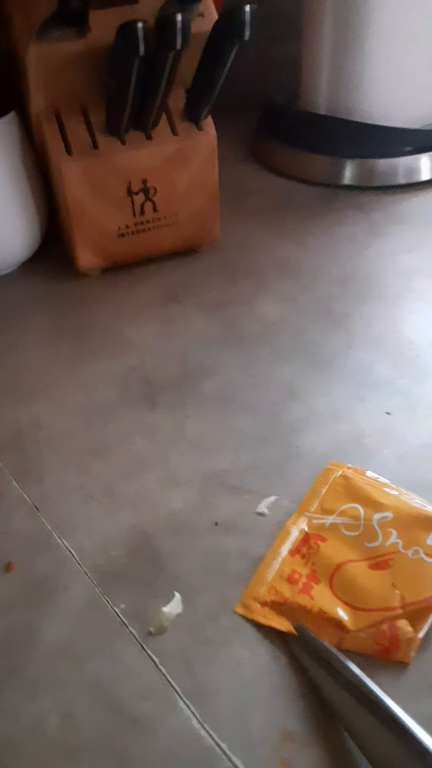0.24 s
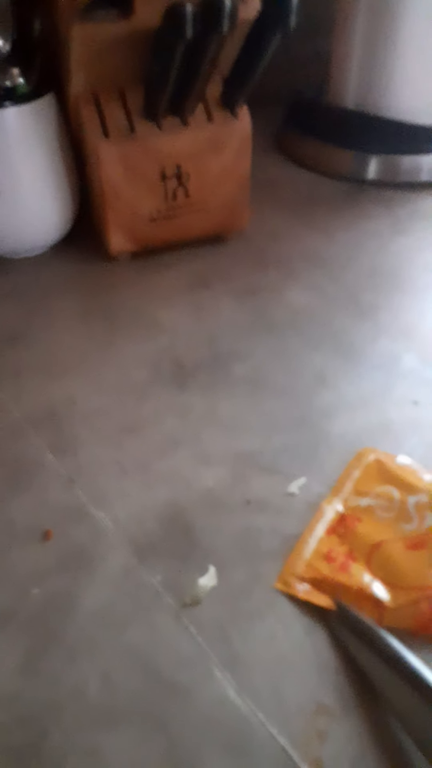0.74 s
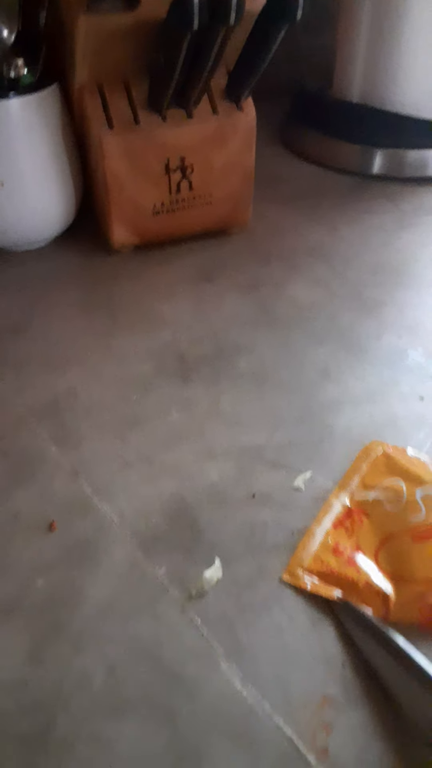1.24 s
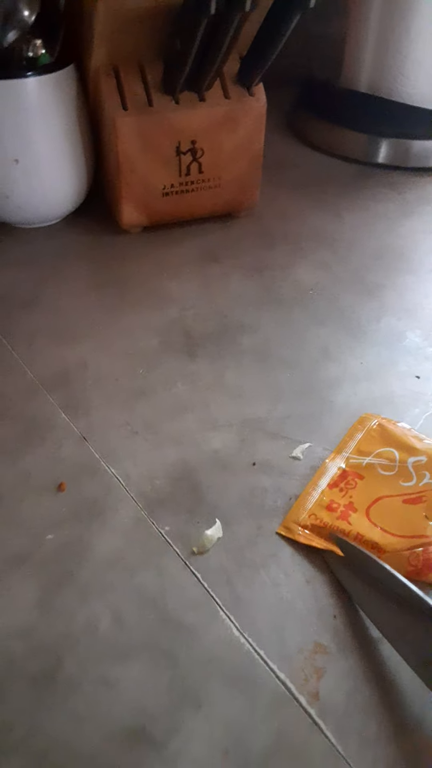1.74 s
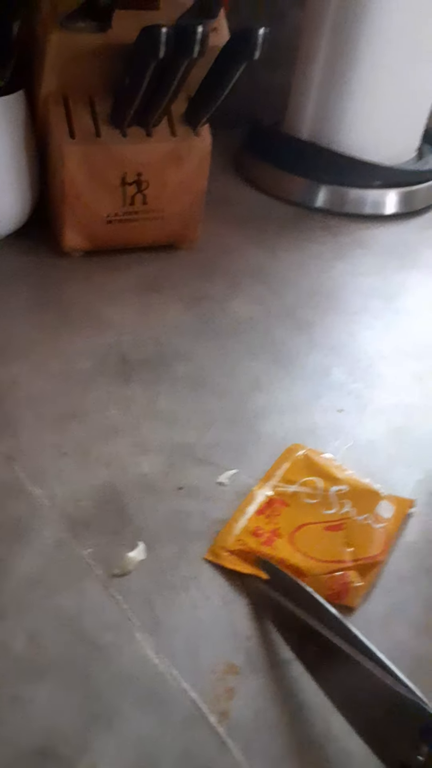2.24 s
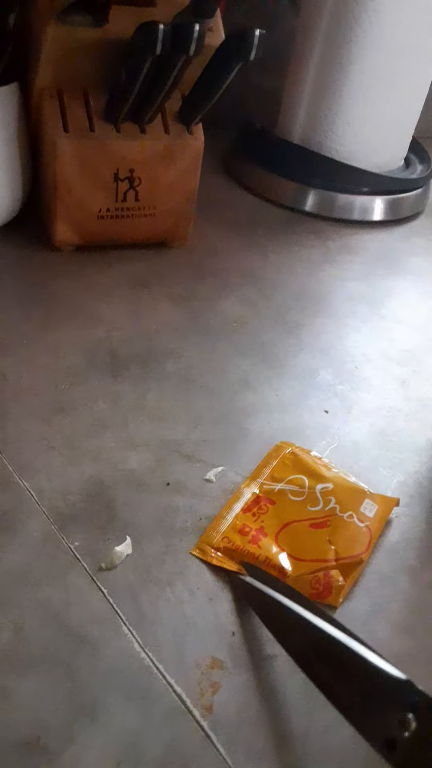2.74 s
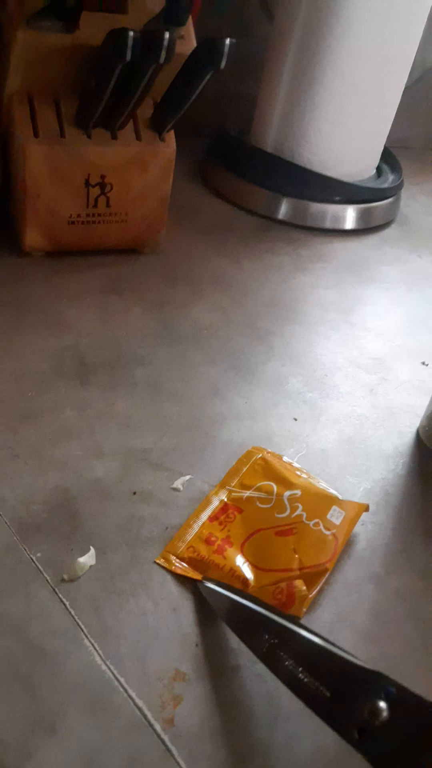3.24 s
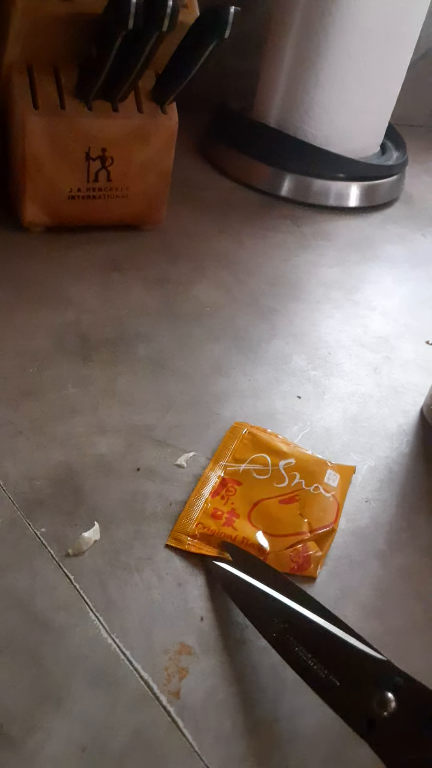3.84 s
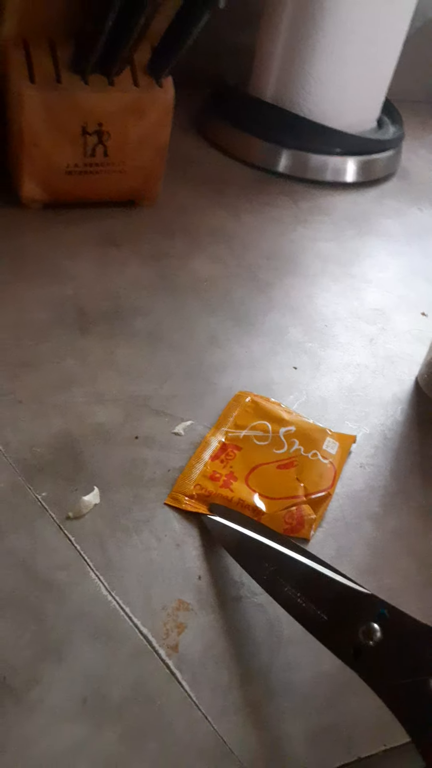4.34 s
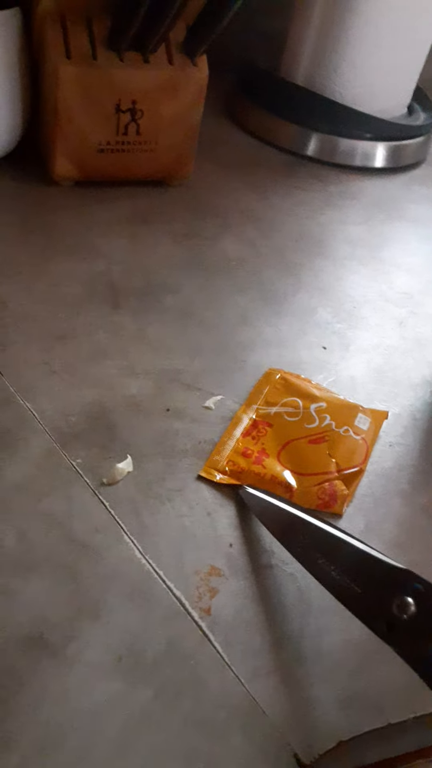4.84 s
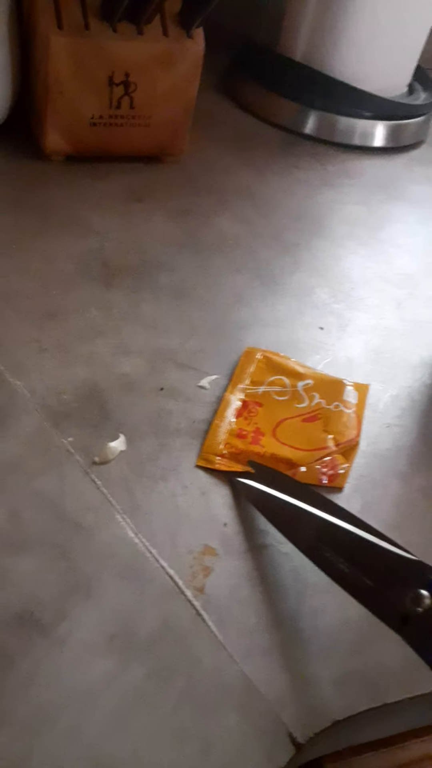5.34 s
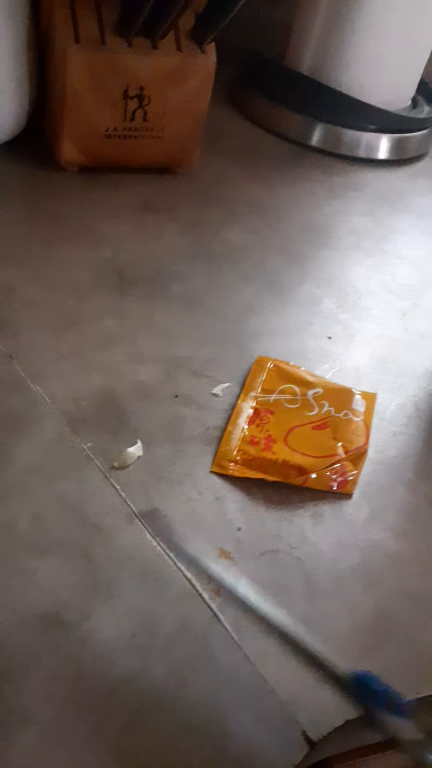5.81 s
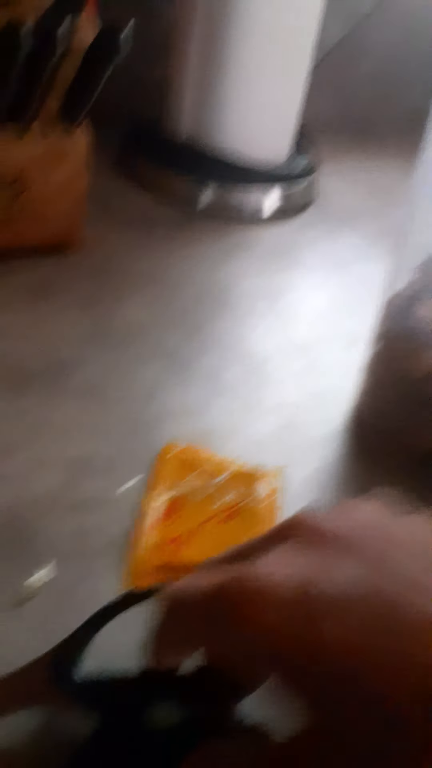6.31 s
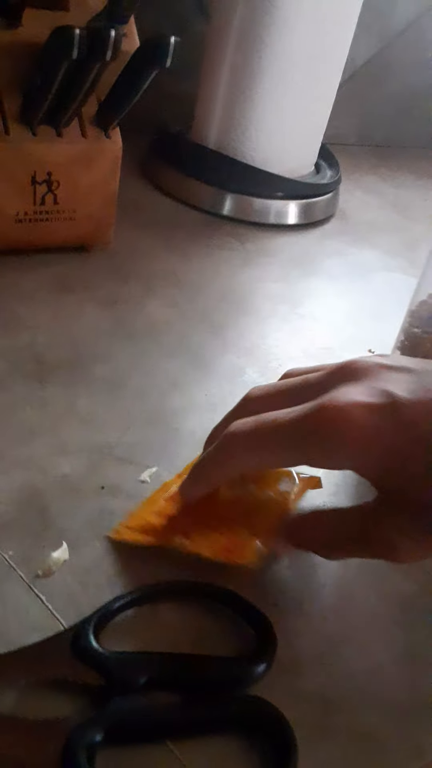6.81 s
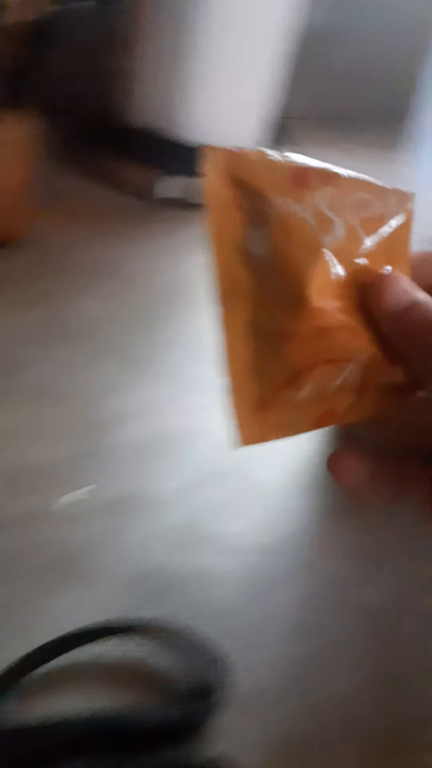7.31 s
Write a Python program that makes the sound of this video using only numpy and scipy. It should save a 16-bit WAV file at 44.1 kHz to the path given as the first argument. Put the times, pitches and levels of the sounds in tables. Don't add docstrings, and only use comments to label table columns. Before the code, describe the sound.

Close to a phone in a small hard kitchen, plastic film hisses and clicks, then scissors bite a sachet in short crackling crunches with thin metallic rings and soft air-pillow thumps. More bites and two hard blade snaps follow after pauses. The scissors drop on the counter, scrape and land with a loud rattling clatter; fingers then gather the packet in light stiff crinkles. A low fridge hum throbs throughout.

```python
import sys
import numpy as np
from scipy import signal
from scipy.fft import rfft, irfft, next_fast_len
from scipy.io import wavfile
from scipy.ndimage import uniform_filter1d

SR = 44100
rng = np.random.default_rng(int(sys.argv[2]) if len(sys.argv) > 2 else 0)


def gain_from_db(level_db):
    decades = np.asarray(level_db, float) / 20
    return 10 ** decades


def bounce(signal):
    frames = np.transpose(np.atleast_2d(signal))
    limited = np.clip(frames, -1, 1)
    pcm = np.round(limited * 32767).astype(np.int16)
    wavfile.write(sys.argv[1], SR, pcm)


N = 333725
SIZE = next_fast_len(N + SR)
HZ = np.maximum(np.arange(SIZE // 2 + 1) * SR / SIZE, 1)
T = np.arange(N) / SR
BURST = 4000
BURST_HZ = np.arange(BURST // 2 + 1) * SR / BURST


def on_log(table):
    table = np.array(table)
    return np.interp(np.log(HZ), np.log(table[:, 0]), table[:, 1])


def shape(x, response):
    return irfft(rfft(x, SIZE) * response, SIZE)[..., :N]


def unit(response):
    return response / np.sqrt(np.mean(abs(response) ** 2))


def resonance(hz, centre, width):
    return 1j * hz * width / (centre ** 2 - hz ** 2 + 1j * hz * width)


def modes(table):
    return sum((-1) ** k * gain_from_db(db) * resonance(HZ, f, w) for k, (f, w, db) in enumerate(table))


def gaps(table):
    response = 1
    for f, w, db in table:
        away = f ** 2 - HZ ** 2
        response = response * (away + 2j * HZ * w * gain_from_db(db)) / (away + 2j * HZ * w)
    return response


def strike(x, table):
    response = modes(table)
    return shape(x, response / abs(irfft(response)).max())


def walk(rate):
    k = int(SR / rate)
    steps = np.repeat(rng.standard_normal(N // k + 1), k)
    return 3.2 * uniform_filter1d(uniform_filter1d(steps, k), k)[:N]


def grains(spread_db, alike=0.52):
    size = gain_from_db(spread_db * np.minimum(rng.exponential(size=N), 4))
    shared, own = rng.standard_normal(N), rng.standard_normal((2, N))
    x = size * (np.sqrt(alike) * shared + np.sqrt(1 - alike) * own)
    return x / x.std()


def curve(rows):
    rows = np.array(rows)
    edge = np.clip(np.minimum(T - rows[0, 0], rows[-1, 0] - T) / 0.0085, 0, 1)
    return edge * gain_from_db(np.interp(T, rows[:, 0], rows[:, 1]))


def strokes(rows, attack_s, fade_db_s, axis):
    power = 0
    for row in rows:
        t = T - row[0]
        rise = np.clip(t / attack_s, 0, 1) ** 2
        fade_db = fade_db_s * np.maximum(t - attack_s - row[1], 0)
        power = power + (rise * gain_from_db(row[axis] - fade_db)) ** 2
    return np.sqrt(power)


def add(out, s, burst):
    i = int(s * SR)
    out[:, i:i + len(burst)] += burst


def swell(ms, skew):
    u = np.arange(BURST) / (max(ms, .05) * SR / 1000)
    return (u / skew) ** skew * np.exp(skew - u)


def near_any(s, times, within_s):
    return min(abs(s - np.array(times))) < within_s


# time_s, level_db
BACK = [(0, 6.5), (0.28, 4.5), (0.5, 1.5), (1.2, 4.5), (2.1, 0.5), (3.3, 2.5), (4.3, 4), (5.3, 3),
        (6.9, 0.5), (7.1, -3.5), (7.567, -4.5)]
# multiple of mains, level_db, throb_depth (0-1), throb_hz
HUM = [(1, -6, 0.8, .38), (2, -1, 0.65, 1.62), (3, -11, 0.1, 1.62), (4, -12, .2, 1.62), (5, -10, .1, 1.62),
       (8, -22, .3, .38), (10, -21, .3, .38)]
# pitch_hz, density_db per Hz
AIR = [(15, -50), (25, -7.5), (107, 1), (132, 3.5), (167, -10.5), (253, -7), (300, -1.5), (321, -2.5),
       (350, -10), (375, -13), (694, -16.5), (1220, -24.5), (1500, -23), (1950, -51), (3300, -120)]
# pitch_hz, density_db per Hz
HISS = [(590, -32), (1000, 3), (1240, 1), (1580, -1.5), (2220, -5), (2650, -6), (5050, -11.5), (5950, -18),
        (8070, -16), (9850, -23.5), (14300, -9), (15900, -18.5), (16500, -39.5)]
MAINS_HZ, THROB_TOP_S = 60, .07
RUMBLE_DB, AIR_DB, HISS_DB, HUM_DB = -63, -66.5, -68, -61


def kitchen():
    open_db = np.interp(T, *np.array(BACK).T)
    hum = 0
    for k, db, depth, rate in HUM:
        level = gain_from_db(db + 0.076 * k * open_db + 0.39 * walk(3.3))
        throb = 1 + depth * np.cos(2 * np.pi * rate * (T - THROB_TOP_S))
        hum = hum + level * throb * np.sin(2 * np.pi * (k * MAINS_HZ * T + rng.random()))
    out = gain_from_db(HUM_DB + 0.43 * open_db + np.array([[1.5], [-1.5]])) * hum
    rumble_db = RUMBLE_DB + 1.1 * open_db + .8 * walk(3.5)
    layers = ((AIR, 15, 160, rumble_db, .85),
              (AIR, 160, 1300, AIR_DB + open_db, .75),
              (HISS, 1300, 17000, HISS_DB + 0.33 * open_db, .3))
    for table, lo_hz, hi_hz, db, alike in layers:
        band = gain_from_db(on_log(table)) / (1 + (lo_hz / HZ) ** 4) / (1 + (HZ / hi_hz) ** 8)
        out = out + gain_from_db(db + 0.19 * walk(7.3)) * shape(grains(.6, alike), unit(band))
    return out


# start_s, hold_s, film_hiss_db, rub_db
SLIDE = [(0.095, 0.25, -51.5, -76), (0.15, 0.11, -52.5, -54.5), (1.295, 0.042, -59.5, -52),
         (1.452, 0.023, -65, -53), (1.58, 0.012, -61, -59), (2.05, 0.0023, -61, -59), (2.12, 0.1, -65, -76),
         (3.73, 0.024, -53.5, -52.5), (4.11, 0.053, -60, -55.5), (4.33, 0.16, -62.5, -71.5),
         (4.97, 0.046, -58.5, -57), (5.025, 0.055, -59, -58.5), (5.565, 0.018, -47.5, -48.5),
         (5.62, 0.015, -54.5, -47), (5.735, 0.014, -60, -66), (6.27, 0.087, -51.5, -75),
         (6.44, 0.13, -53.5, -74.5)]
# pitch_hz, density_db per Hz
FILM = [(1180, -39.5), (2000, -15.5), (4240, -6.5), (5050, -12.5), (5720, -4.5), (6760, -12.5),
        (8360, -2.5), (9460, -9), (15000, -3), (15900, -5), (16500, -35.5)]
# pitch_hz, density_db per Hz
RUB = [(88, -41), (150, -10.5), (218, -10), (306, 0), (414, -10.5), (692, -8.5), (983, -20.5),
       (1300, -13.5), (3000, -33), (3900, -34.5), (6600, -120)]
# pitch_hz, width_hz, lift_db
LIFTED_BANDS = [(4200, 250, 4.5), (5700, 290, 7.5), (8200, 460, 1), (10800, 500, 4.5), (13300, 600, 4),
                (15100, 400, 3)]
# start_s, hold_s, level_db
SQUEAKS = [
    (3.93, .07, -71),
    (5.44, .14, -71.5),
]
# pitch_hz, width_hz, level_db
SQUEAK = [(2030, 40, 1), (2160, 40, 0)]
LIFTED_UNTIL_S, LIFTED_SHEEN_DB = 1.2, 4
STROKE_ATTACK_S, STROKE_FADE_DB_S = 0.044, 270


def slide():
    hiss = strokes(SLIDE, STROKE_ATTACK_S, STROKE_FADE_DB_S, axis=2) * gain_from_db(0.71 * walk(54) - 5)
    hiss = hiss * grains(1.6, alike=0.19)
    rub = strokes(SLIDE, STROKE_ATTACK_S, STROKE_FADE_DB_S, axis=3) * gain_from_db(1.2 * walk(40) - 3)
    rub = rub * grains(6.3, alike=0.94)
    squeak = strokes(SQUEAKS, STROKE_ATTACK_S, STROKE_FADE_DB_S, axis=2) * grains(1.2, alike=0.81)
    film = unit(gain_from_db(on_log(FILM)))
    sheen_db = LIFTED_SHEEN_DB * (2 / (1 + (11000 / HZ) ** 6) - 1.5)
    lifted_film = film * gaps(LIFTED_BANDS) * gain_from_db(sheen_db - 2)
    flat = T > LIFTED_UNTIL_S
    out = shape(hiss * flat, film) + shape(hiss * ~flat, lifted_film)
    return out + shape(rub, unit(gain_from_db(on_log(RUB)))) + shape(squeak, unit(modes(SQUEAK)))


# start_s,
# level_db, pitch_hz, width_hz
POPS = [(0.31, -48, 3400, 900), (0.3891, -21.5, 2250, 610), (0.3935, -36, 2100, 260),
        (6.2567, -20, 3750, 500), (6.272, -26.5, 3800, 300), (6.289, -28, 3800, 300),
        (5.7952, -38.5, 900, 220), (4.7605, -36.5, 1310, 130), (4.759, -36, 270, 60),
        (5.058, -46.5, 9000, 3000), (6.8385, -40, 2180, 400)]
# start_s, level_db, length_ms, pitch_hz
CATCHES = [(6.1, -30.5, 6, 696), (6.122, -35.5, 2.5, 2105), (6.128, -30.5, 5, 236), (6.152, -30, 5, 704),
           (6.155, -29, 7, 226), (6.17, -37.5, 2, 2115), (6.18, -28, 4.5, 663), (6.183, -32, 4, 1236),
           (6.195, -30, 8, 227), (6.205, -34, 9, 1255), (6.21, -35, 5, 700), (6.235, -32.5, 4, 700)]
POP_ATTACK_MS = .35


def pops():
    out, t = np.zeros((2, N)), T[:BURST]
    for s, db, hz, width in POPS:
        envelope = (1 - np.exp(-1000 * t / POP_ATTACK_MS)) * np.exp(-np.pi * width * t)
        add(out, s, gain_from_db(db + 4.5) * envelope * np.sin(2 * np.pi * hz * t))
    for s, db, ms, hz in CATCHES:
        add(out, s, gain_from_db(db) * swell(ms, 2.5) * np.sin(2 * np.pi * hz * t))
    return out


# start_s, level_db, pitch_hz, low_knock_db,
# treble_db
CLICKS = [(0.358, -51, 3060, -76, -19), (0.388, -45, 2300, -53, 2), (1.5958, -41, 4100, -58, 4),
          (1.8485, -44.5, 8350, -66, -22), (2.086, -46, 8650, -49.5, -19), (3.3955, -12.5, 4240, -38.5, 10),
          (3.738, -40, 9000, -70, -17), (3.914, -47, 1520, -66, -3), (5.074, -39, 9000, -64, -16),
          (4.76, 0.5, 8800, -29, -2), (5.0567, -35, 11960, -48, -18.5), (5.6212, -31, 8500, -68, -12),
          (5.7565, -50.5, 8500, -75, -21.5), (5.7626, -35, 8700, -75, -20.5), (5.7755, -46, 8000, -79, -9),
          (5.7944, -14.5, 9400, -56, -5), (6.2561, -3, 9000, -40, 0), (6.685, -47, 4580, -57.5, -20),
          (6.6944, -36.5, 1690, -70, -12), (6.7096, -41, 2200, -57, -14), (6.7712, -38, 7400, -69, -8),
          (6.811, -34.5, 3000, -57, -18), (6.8179, -31, 5300, -82, -7.5), (6.8382, -36.5, 2160, -76, -20),
          (6.9765, -50, 4970, -70, -12), (7.021, -35, 4660, -74, 1)]
CLEAN_CLICKS_S = [
    0.389,
    6.256,
    6.838,
]
# click_s, level_db
SQUEEZES = [
    (3.3953, -47),
    (4.76, -20),
]
# pitch_hz, width_hz, level_db
BAG = [(323, 63, 1), (450, 210, -12.5), (262, 84, -3.5)]
# pitch_hz, width_hz, level_db
BLADE = [(860, 130, -5.5), (1290, 77, -4), (2200, 160, -12)]
SPRAY_MS, CLEAN_SPRAY_DB = 2.4, -11.5


def clicks():
    out, knock = np.zeros((2, 2, N))
    noises = rng.standard_normal((len(CLICKS), BURST))
    before = swell(2, 4.6) * (np.arange(BURST) < .008 * SR)
    for (s, db, centre_hz, low_db, treble_db), noise in zip(CLICKS, noises):
        broad = gain_from_db(treble_db) * 1j * BURST_HZ / (3000 + 1j * BURST_HZ)
        pitched = .8j * BURST_HZ * centre_hz / (centre_hz ** 2 - BURST_HZ ** 2 + .8j * BURST_HZ * centre_hz)
        colour = broad + pitched ** 2
        crack = irfft(colour) * (np.arange(BURST) < 400)
        spray = irfft(rfft(noise) * colour)
        clean_db = CLEAN_SPRAY_DB if near_any(s, CLEAN_CLICKS_S, .005) else 0
        spray *= gain_from_db(clean_db) / spray.std()
        burst = gain_from_db(db + 3.5) * crack / abs(crack).max()
        burst += gain_from_db(db - 18.5) * spray * swell(SPRAY_MS, 0.46)
        add(out, s + 0.000884, burst)
        squeeze = sum(gain_from_db(squeeze_db) for at, squeeze_db in SQUEEZES if abs(at - s) < .01)
        add(out, s - .007, squeeze * spray[::-1] * before)
        add(knock, s + 0.0011, gain_from_db(low_db + 3) * swell(1, 1.1))
    return out + shape(knock * grains(1.3, alike=0.95), unit(modes(BAG + BLADE)))


# start_s, crackle_db, blade_db, bag_thump_db, length_ms
SNIPS = [(0.884, -18.5, -29, -24.5, 11.4), (0.9306, -24.5, -36, -29, 9.7), (1.016, -18.5, -25, -27, 20.9),
         (1.346, -35, -41.5, -46, 9.6), (3.1295, -18, -33, -30, 17.7), (3.253, -20, -39, -32, 18),
         (3.362, -23, -44, -37.5, 9.1), (3.7519, -17.5, -50, -64, 7), (4.6152, -12.5, -32.5, -39, 15.5),
         (4.6555, -16, -37.5, -29, 8), (5.5958, -40, -51.5, -55, 19), (5.7635, -37, -64.5, -80.5, 19)]
WIDE_BITES_S = [
    0.93,
    4.615,
    5.763,
]
# pitch_hz, density_db per Hz
CRACKLE = [(1470, -62), (2500, -13.5), (2930, -22.5), (3830, -18.5), (4850, -20.5), (6200, -10),
           (6750, -13), (7670, -1.5), (9800, -4), (14000, -3.5), (15500, -2), (16500, -34.5)]
# pitch_hz, width_hz, level_db
BAG_LIFTED = [(281.4, 37, 8.5), (590, 170, -4.5), (740, 74, 1.5)]
# start_s, level_db
TAPS = [(0.886, -32), (.889, -40), (1.0205, -17), (1.0245, -19), (1.0265, -8.5), (1.0295, -13),
        (1.356, -41), (1.373, -44), (1.478, -50), (1.492, -47), (1.5, -47), (1.506, -48), (1.52, -52),
        (1.607, -44)]
# pitch_hz, width_hz, level_db
TIP = [(478, 47, 12), (1130, 110, -50), (1550, 220, 4.5), (2100, 55, -24), (2080, 110, 1)]
# pitch_hz, width_hz, level_db
THUD = [(256.6, 32.6, 1), (112, 69, -7), (332.6, 93, -5.5)]
BLADE_HZ, WIDE_BLADE_HZ = 1226, 815


def snips():
    film, ring, flat, lifted, tap = np.zeros((5, 2, N))
    upper = 0.12 * resonance(BURST_HZ, 1700, 1607) - 0.27 * resonance(BURST_HZ, 2300, 440)
    soft = swell(0.17, 1.2) / swell(0.17, 3.5).sum()
    noises = rng.standard_normal((len(SNIPS), BURST))
    for (s, db, blade_db, bag_db, ms), noise in zip(SNIPS, noises):
        add(film, s - .001, gain_from_db(db - 13) * swell(0.37 * ms, 0.42))
        blade_hz = WIDE_BLADE_HZ if near_any(s, WIDE_BITES_S, .01) else BLADE_HZ
        rubbing = rfft(noise * swell(0.2 * ms, 1.3))
        blade = irfft(rubbing * (resonance(BURST_HZ, blade_hz, 170) + upper))
        add(ring, s, gain_from_db(blade_db + 3) * blade / abs(blade).max())
        bag = lifted if s < LIFTED_UNTIL_S else flat
        add(bag, s + 0.343 * ms / 1000, gain_from_db(bag_db) * soft)
        add(bag, s + 0.6965 * ms / 1000, gain_from_db(bag_db + 1) * soft)
    for s, db in TAPS:
        add(tap, s + 0.0013, gain_from_db(db - 2) * np.ones(3) / 3)
    crackle = shape(film * grains(1.3), unit(gain_from_db(on_log(CRACKLE))))
    thump = strike(flat, BAG) + strike(lifted, BAG_LIFTED)
    thump += gain_from_db(-8) * strike(flat + lifted, THUD[1:2])
    damped_tip = [(f, 70 + w, db) for f, w, db in TIP]
    return crackle + ring + thump + strike(tap, damped_tip)


# start_s, level_db
SHUTS = [
    (4.7608, -20),
    (5.7952, -13.5),
    (3.3962, -37),
]
# pitch_hz, width_hz, level_db
SHUT = [(3190, 180, -5), (4400, 530, -11), (5300, 430, -7.5), (6690, 500, -10), (8300, 400, -3),
        (9600, 560, -4), (11000, 500, -4), (12600, 500, -14)]
# start_s, level_db, length_ms
PINGS = [
    (1.321, -57, 3.5),
    (1.33, -55, 2),
    (1.347, -38.5, 1.76),
    (1.386, -47, 1.5),
    (1.527, -55, 1.5),
    (1.608, -57, 2),
]
PING_HZ = 1304


def shut():
    blow, ping = np.zeros((2, 2, N))
    for s, db in SHUTS:
        add(blow, s, gain_from_db(db) * swell(0.22, .3) * rng.standard_normal(BURST) / 2.1)
    for s, db, ms in PINGS:
        add(ping, s, gain_from_db(db) * swell(ms, 2.5) * np.sin(2 * np.pi * PING_HZ * T[:BURST]))
    return strike(blow, SHUT) + ping


# start_s, level_db, brightness_db
KNOCKS = [(5.9875, -5, -9.5), (5.989, -7, -8.5), (5.992, -11, -15), (5.996, -14.5, -15.5),
          (6.013, -18.5, -17.5), (6.015, -17.5, -17.5), (6.107, -27, -20.5), (6.127, -23.5, -18),
          (6.159, -24, -14), (6.187, -21.5, -8.5), (6.255, -13.5, -7), (6.256, -15.5, -6.5),
          (6.263, -22, -9.5), (6.273, -18.5, -13), (6.288, -18.5, -17), (6.293, -22, -17.5),
          (6.392, 1.5, -14.5), (6.394, -7.5, -21.5), (6.395, -4, -23.5), (6.399, -20.5, -19.5),
          (6.406, -19.5, -22.5), (6.419, -21, -16), (6.427, -3, -13), (6.43, -5, -22), (6.433, -10, -22),
          (6.438, -17.5, -21), (6.447, -6.5, -22.5), (6.457, -16, -24.5), (6.461, -15, -23.5),
          (6.469, -8.5, -24.5), (6.476, -18.5, -26), (6.483, -16.5, -25.5), (6.498, -24, -26.5),
          (6.509, -30, -24)]
# pitch_hz, width_hz, level_db
BODY = [(258, 110, 1), (674, 42, 4), (1342, 110, 5.5), (1970, 80, -1.5), (2390, 70, -7), (3100, 100, -7.5),
        (3780, 80, -12.5), (4000, 60, -9)]
# time_s, level_db
DRAG = [
    (6.003, -24.5),
    (6.04, -31),
    (6.07, -33),
    (6.1, -33),
    (6.143, -32),
    (6.185, -29),
    (6.21, -35.5),
    (6.252, -39.5),
]
# pitch_hz, width_hz, level_db
SKID_FLAT = [(258, 35, -0.5), (673, 110, -0.5), (1060, 40, -9), (1351, 150, -6), (1970, 70, -14),
             (2250, 70, -15), (2950, 50, -19.5), (3160, 50, -21), (3940, 130, -15.5), (4750, 160, -29),
             (5460, 70, -26), (6880, 130, -19), (9000, 220, -24.5)]
# pitch_hz, width_hz, level_db
SKID = [(231, 15, 2.5), (660, 120, -3), (1210, 82, -2), (2070, 87, -8), (2630, 81, -19), (2970, 51, -18),
        (3220, 90, -21), (3955, 120, -18), (4800, 140, -28), (5550, 100, -27), (6760, 74, -26),
        (9000, 240, -24), (9310, 36, -29)]
# pitch_hz, width_hz, level_db
SKID_GAPS = [(980, 80, -14), (1780, 200, -14), (440, 60, -9.5), (3660, 120, -16.5), (6050, 120, -9.5)]
# pitch_hz, density_db per Hz
GRIT = [(1470, -23), (2500, 0.5), (2840, -11.5), (3770, -2.5), (7370, -11), (8840, -8.5), (11700, -12),
        (15100, -10.5), (16500, -37)]
# start_s, length_s, rattle_db, fade_db_per_s
ROCK = [
    (6.255, .12, -33, 172),
    (6.393, 0.28, -21, 144),
]
# pitch_hz, density_db per Hz
RATTLE = [(47, -47.5), (80, -24), (327, -11.5), (373, -13.5), (517, -7), (552, -14.5), (672, -8.5),
          (818, -7.5), (1150, -19.5), (1310, -6.5), (3200, -25.5), (3800, -22.5), (4400, -33), (5200, -66),
          (8800, -120)]
# start_s, level_db, length_ms
JANGLES = [
    (6.421, -29, 1.2),
    (6.429, -31.5, 0.66),
    (6.436, -28, 2),
    (6.453, -35, 1),
]
# pitch_hz, density_db per Hz
CHATTER = [(1290, -30), (2200, -7.5), (3770, -19.5), (6420, -18.5), (8130, -13), (9540, -17.5),
           (14900, -13), (16100, -21.5), (16500, -48.5)]
PUSH_MS = 0.027
SLAB_DB, SLAB_PER_DB = -10.5, 1.04
DRAG_GRIT_DB = -18
TIPS_UP_S, TIPS_UP_TAKES_S = 6.06, 0.045
CHATTER_DB, CHATTER_PER_DB = -23.5, 0.84


def scissors():
    push, thud, tick, jangle = np.zeros((4, 2, N))
    blow = swell(PUSH_MS, 1.4)
    slab = swell(0.21, 1.1) / swell(0.18, 1.3).sum()
    for s, db, bright_db in KNOCKS:
        add(push, s + 0.00239, gain_from_db(db + 0.5) * blow / blow.sum())
        add(thud, s + 0.0028, gain_from_db(SLAB_DB + SLAB_PER_DB * db) * slab)
        add(tick, s + .0022, gain_from_db(db + bright_db - 5.5) * swell(1.5, 0.34))
    for s, db, ms in JANGLES:
        add(jangle, s, gain_from_db(db) * swell(ms, 1))
    damped = [(f, 70 + 1.1 * w, db) for f, w, db in BODY[1:]]
    grit = gain_from_db(on_log(GRIT))
    tick_colour = unit(grit + modes(SKID_FLAT[6:]) * gain_from_db(12))
    knocks = strike(push, damped) + strike(thud, THUD) + shape(tick * grains(1.5), tick_colour)

    slip = gain_from_db(1.1 * walk(83))
    pressure = curve(DRAG) * slip
    rubbing = pressure * gain_from_db(-3) * grains(3.5, alike=.9)
    tipped = np.clip((T - TIPS_UP_S) / TIPS_UP_TAKES_S, 0, 1)
    scrape = shape(rubbing * np.sqrt(tipped), unit(modes(SKID) * gaps(SKID_GAPS)))
    scrape += shape(rubbing * np.sqrt(1 - tipped), unit(modes(SKID_FLAT) * gaps(SKID_GAPS)))
    high_grit = unit(grit / (1 + (4800 / HZ) ** 6))
    scrape += shape(pressure * gain_from_db(DRAG_GRIT_DB) * grains(1.2), high_grit)

    rock = sum(curve([(s, db), (s + length, db - fade * length)]) for s, length, db, fade in ROCK)
    rattle = shape(rock * gain_from_db(1) * slip * grains(4.3, alike=0.79), unit(gain_from_db(on_log(RATTLE))))
    chatter = rock ** CHATTER_PER_DB * gain_from_db(CHATTER_DB) * slip + jangle
    rattle += shape(chatter * grains(1.7), unit(gain_from_db(on_log(CHATTER))))
    return knocks + scrape + rattle


# start_s, hold_s, crinkle_db, sheen_db
GRAB = [
    (6.672, 0.015, -46.5, -52.5),
    (6.72, .015, -56, -51),
    (6.742, 0.01, -55, -54),
    (6.8, 0.0026, -54, -49.5),
    (6.83, 0.029, -55, -63),
    (6.88, 0.057, -60, -67.5),
    (6.96, .02, -56, -61),
    (7.0, .006, -61.5, -67),
]
# pitch_hz, density_db per Hz
CRINKLE = [(710, -15), (1200, -17), (1840, -11), (2150, -16.5), (3550, -18), (5700, -12), (11100, -17),
           (12000, -13), (15300, -15), (16000, -24), (16500, -45)]
GRAB_ATTACK_S, GRAB_FADE_DB_S = 0.0182, 423


def grab():
    colour, high = gain_from_db(on_log(CRINKLE)), 1 / (1 + (6000 / HZ) ** 6)
    snaps = gain_from_db(1.9 * walk(120) - 8) * grains(2.14)
    crinkle = strokes(GRAB, GRAB_ATTACK_S, GRAB_FADE_DB_S, axis=2) * snaps
    sheen = strokes(GRAB, GRAB_ATTACK_S, GRAB_FADE_DB_S, axis=3) * snaps
    return shape(crinkle, unit(colour * (1 - high))) + shape(sheen, unit(colour * high))


# pitch_hz, width_hz, level_db
BOUNCE_GAPS = [(1744, 190, -10), (5130, 220, -2.5), (9700, 350, -3.5)]
# pitch_hz, left_minus_right_db
TILT = [(40, 5.5), (300, 3.5), (600, 0), (1300, 0), (2500, 1.5), (5000, 4.5), (10000, -2.5), (16000, -2.5)]
# pitch_hz, difference_minus_sum_db
SIDE_PORTS = [(60, -9.5), (200, -20.5), (380, -11), (700, -10.5), (1290, -1), (2380, 1.5), (4400, 0.5),
              (15000, -3)]


def ports(x, smear_ms=0.3, echo_db=-8.5):
    echoes = rng.standard_normal((2, 400)) * np.exp(-np.arange(400) / (smear_ms * SR / 1000))
    echoes = rfft(echoes / np.sqrt((echoes ** 2).sum(axis=1, keepdims=True)), SIZE)
    close = gain_from_db(echo_db) * echoes * 1j * HZ / (1700 + 1j * HZ)
    lead = np.array([[1j], [-1j]]) * gain_from_db(on_log(SIDE_PORTS))
    balance = gain_from_db(np.array([[.5], [-.5]]) * on_log(TILT))
    return shape(x, gaps(BOUNCE_GAPS) * balance * (1 + close - lead))


# pitch_hz, t60_s, level_db
ROOM = [(143.5, 0.26, -3.5), (416, 0.16, -5), (1090, 0.17, -9), (3730, 0.29, -10), (8200, 0.26, -14.5),
        (14100, 0.2, -20.5)]
# pitch_hz, t60_s, level_db
LATE = [(352.3, 0.48, -14.5), (2600, 0.67, -15.5)]
# pitch_hz, width_hz, level_db
ROOM_GAPS = [(372, 35, -9.5), (305, 30, 2.5), (130, 20, -4.5), (186, 25, 3.5), (3400, 400, 1.5),
             (11000, 400, -5)]


def room(x):
    t, tail, hz_axis = T[:SR], 0, np.maximum(np.arange(SR // 2 + 1), 1)
    cells = signal.stft(rng.standard_normal((3, SR)), nperseg=256)[2]
    even = signal.istft(cells / np.sqrt(abs(cells)), nperseg=256)[1][:, :SR]
    even = rfft(even / even.std())
    for hz, t60, db in ROOM + LATE:
        alike = 0.97 / (1 + hz / 1800)
        mixed = np.sqrt(alike) * even[0] + np.sqrt(1 - alike) * even[1:]
        noise = irfft(mixed * np.exp(-(np.log2(hz_axis / hz) / 1.105) ** 2), SR)
        decay = gain_from_db(-60 * t / t60) * np.clip(t / 0.0047, 0, 1)
        tail = tail + gain_from_db(db) * noise * decay * np.sqrt(2 * np.log(1000) / (t60 * SR))
    return shape(x[0], rfft(tail, SIZE) * gaps(ROOM_GAPS))


SHUT_ROOM_DB = -5
CLOSE_UNTIL_S, CLOSE_ROOM_DB = .5, -10


def scene():
    near = slide() + pops() + clicks() + snips() + scissors() + grab()
    blades = shut()
    to_room = (near + gain_from_db(SHUT_ROOM_DB) * blades) * gain_from_db(CLOSE_ROOM_DB * (T < CLOSE_UNTIL_S))
    return kitchen() + ports(near + blades) + room(to_room)


def band_limit(x):
    return signal.sosfilt(signal.butter(12, 17320, fs=SR, output="sos"), x)


def record(dry):
    rounded = np.tanh(0.76 * dry) / 0.84
    bass_cut = 1 / (1 + (75 / HZ) ** 2)
    top_cut = gain_from_db(-18) / (1 + (HZ / 16900) ** 60) + 1 / (1 + (HZ / 15800) ** 200)
    return band_limit(shape(rounded, bass_cut * top_cut))


dry = scene()
out = record(dry)
bounce(out)
```